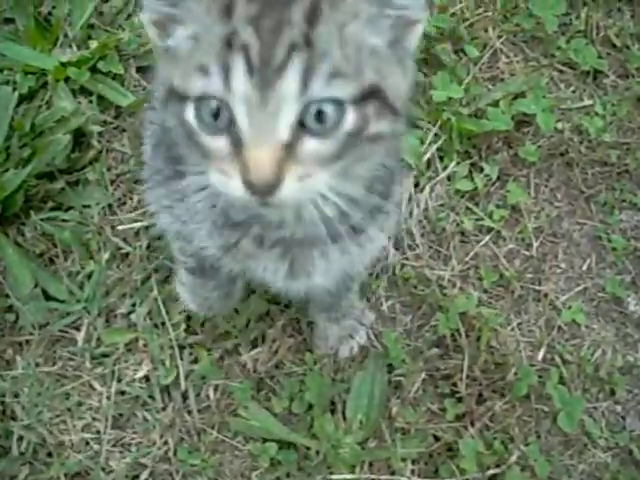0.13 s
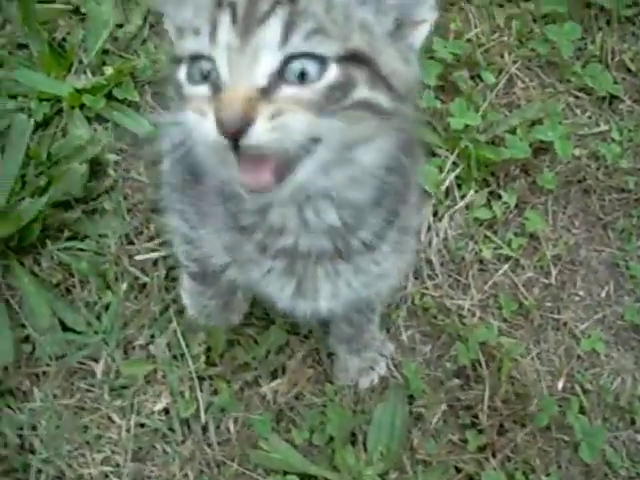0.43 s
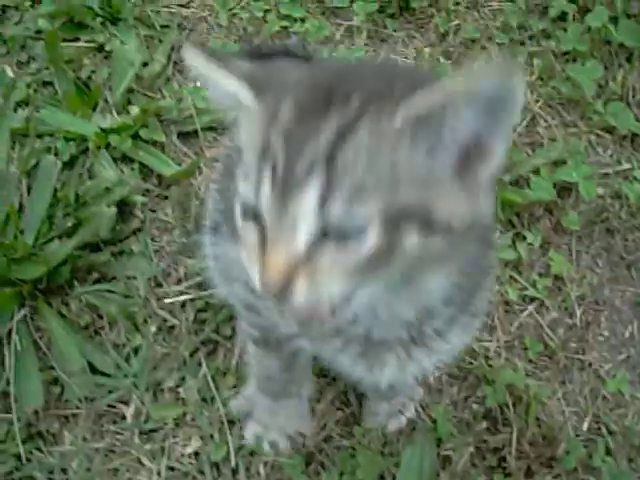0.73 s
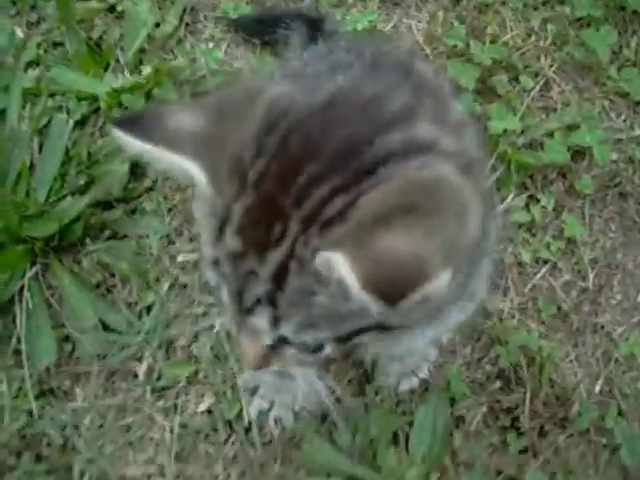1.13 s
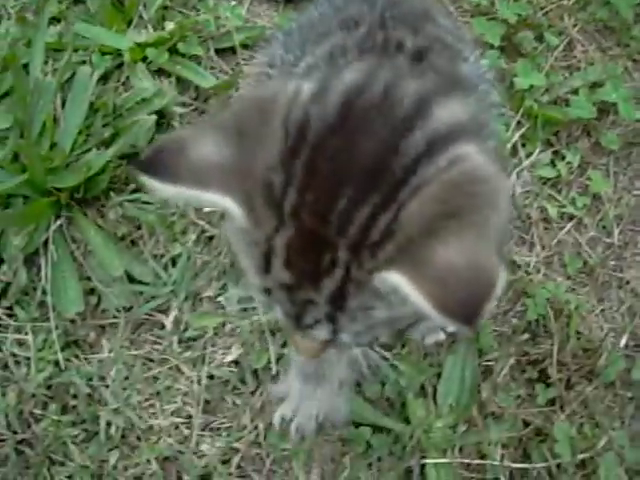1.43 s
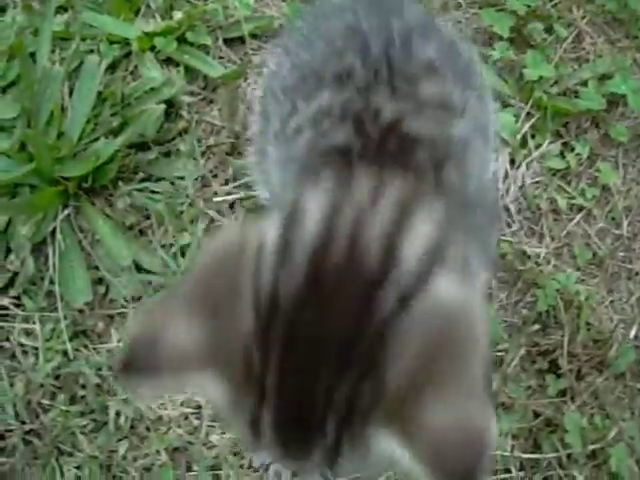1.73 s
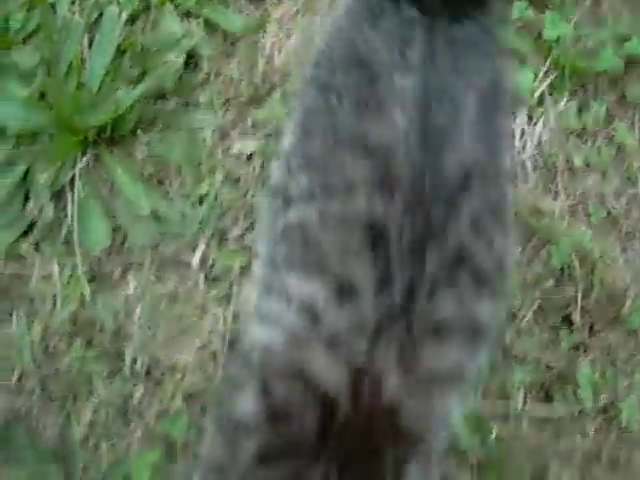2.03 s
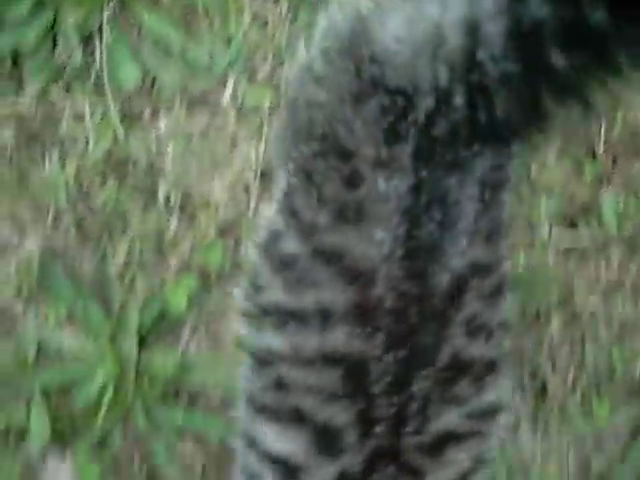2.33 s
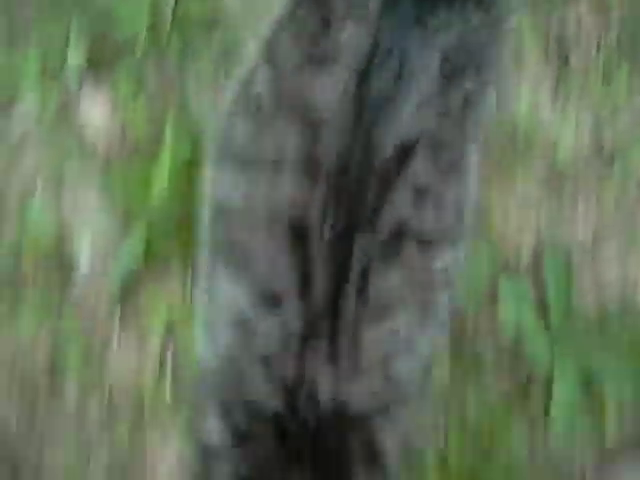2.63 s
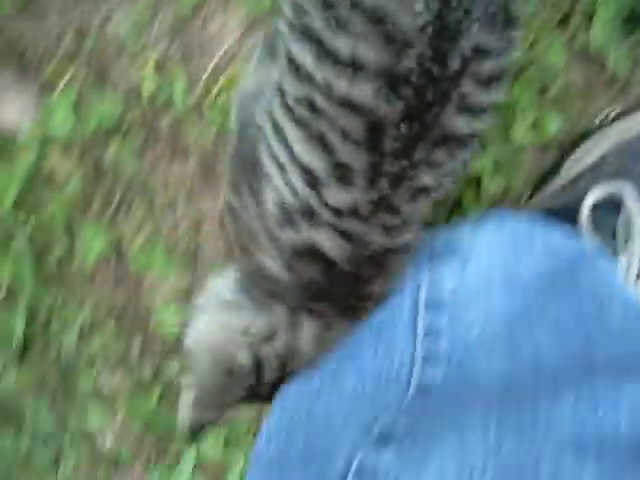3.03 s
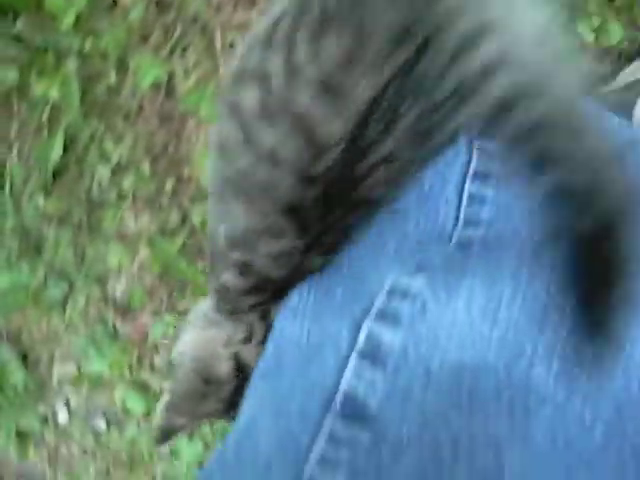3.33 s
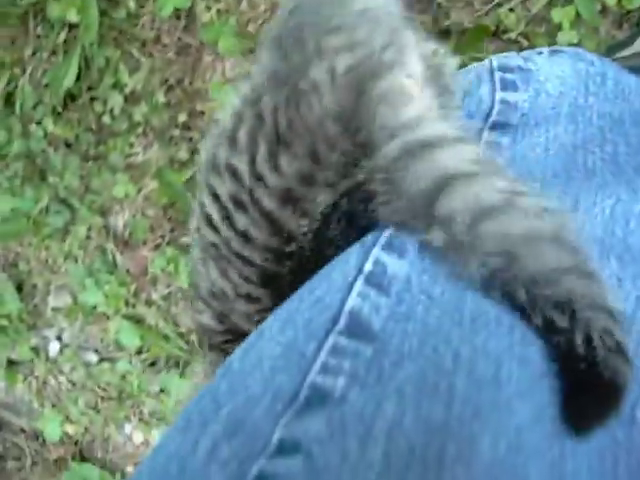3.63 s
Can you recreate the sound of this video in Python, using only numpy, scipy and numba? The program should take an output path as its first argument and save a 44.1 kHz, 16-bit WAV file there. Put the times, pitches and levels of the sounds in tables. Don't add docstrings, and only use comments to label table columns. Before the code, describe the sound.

A kitten meows once, close up outdoors: lip smacks at 0.3 s, a tiny squeak at 0.44, then a nasal cry from 0.46 to 1.24, dropping quickly to a wavering middle pitch, crackling around 0.8 and fading. Wet clicks follow at 1.25. Distant traffic rumble and low hum persist; a faint insect throbs near 1.7-2.3, paws and cloth rustle increasingly, and a sharp camera tap hits at 3.7. Grainy, treble-limited microphone.

```python
import sys
import numpy as np
from scipy import signal
from scipy.io import wavfile
from scipy.ndimage import uniform_filter1d
from numba import njit

SR = 44100
rng = np.random.default_rng(int(sys.argv[2]) if len(sys.argv) > 2 else 0)


def master(y):
    cut = np.clip(np.atleast_2d(y).T, -1, 1)
    pcm = np.round(cut * 32767)
    wavfile.write(sys.argv[1], SR, pcm.astype(np.int16))


def gain_from_db(level_db):
    decades = np.asarray(level_db, float) / 20
    return 10 ** decades


N = 166257

# f/Hz, level/dB [dB per Hz]
AIR_SPECTRUM = [(12, -27), (20, 0), (54, -5), (113, -4.5), (141, -8), (355, -15), (493, -18), (628, -11.5),
                (3800, -26), (4940, -52.5), (8360, -120)]
# t/s, level/dB
HUM_LEVEL = [(0, -58.5), (1.2, -53), (2.0, -58.5), (2.6, -66), (3.2, -62), (3.77, -59.5)]
# centre t/s, half length/s
INSECT_BOUTS = [
    (1.722, 0.18),
    (2.284, 0.36),
]
# t/s, level/dB
RUSTLE_LEVEL = [(0, -78.5), (1.6, -72), (2.6, -67.5), (3.0, -61.5), (3.3, -57.5), (3.77, -54.5)]
# t/s, boost level/dB
STEPS = [
    (1.62, 18),
    (2.07, 15),
    (2.63, 14.5),
    (2.9, 3),
    (3.069, 4),
    (3.14, 5.5),
    (3.3, 5.5),
]
# f/Hz, level/dB, t60/s
BODY_MODES = [(383, -18.5, 0.062), (1520, -7.5, .008), (2150, -2, 0.009), (3290, -12, 0.014),
              (3360, 0, 0.0074), (3526, -1.5, 0.014)]
# t/s, peak level/dB, low ring f/Hz, high ring f/Hz
SMACKS = [
    (.3070, -29, 1160, 2040),
    (.3410, -21.5, 980, 2100),
    (.350, -35, 1710, 1900),
    (0.372, -42.5, 3340, 3770),
    (1.2533, -31, 1270, 2300),
    (1.2574, -19.5, 1391, 2623),
    (1.2635, -36.5, 1000, 3200),
    (1.2975, -37.5, 2000, 2200),
]
# t/s, length/s, crackle peak level/dB, pulse rate f/Hz, clean tone dip level/dB
CATCHES = [
    (0.546, .006, -33.5, 560, -0.5),
    (0.672, .012, -28, 670, -0.5),
    (.775, 0.038, -24, 276, -1.5),
    (0.818, 0.01097, -19, 330, -7),
    (0.865, 0.015, -21.5, 560, -12),
    (0.898, 0.013, -28.5, 480, -6),
    (0.979, .013, -27, 450, -7),
    (1.016, .010, -29.5, 590, -6),
]
# t/s, length/s, pitch f/Hz, level/dB
SQUEAK = (.4365, .008, 1080, -38)
# t/s, pitch f/Hz, level/dB, mouth resonance f/Hz, chest tone level/dB
FALLING = [(0.458, 1069, -53, 2100, -46), (.463, 875, -53, 2150, -51.5), (.475, 774, -51, 2300, -53.5),
           (0.499, 678, -49, 2180, -57.5), (.53, 616, -46.5, 2340, -58.5), (.566, 579, -41.5, 2300, -63),
           (.6, 549, -38, 2215, -57.5), (.636, 522.3, -39.5, 2120, -61), (0.671, 516.3, -34.5, 2470, -62)]
HELD = [(.684, 495.3, -36.5, 2570, -55), (.702, 480.4, -34.5, 2790, -55), (.738, 486.4, -34, 2750, -59.5),
        (0.765, 491.3, -42.5, 2495, -63.5), (.83, 520.8, -37, 2240, -57), (0.861, 514.4, -42, 2253, -66),
        (0.896, 491.8, -40, 2170, -58.5), (0.939, 494.5, -44, 2255, -59.5),
        (0.971, 516.5, -43.5, 2010, -66.5)]
FADING = [(0.995, 518, -43.5, 2103, -56), (1.019, 568.5, -48, 2050, -65), (1.035, 531.5, -46.5, 2000, -57),
          (1.083, 525.8, -47, 1974, -63.5), (1.117, 487, -48, 2050, -56.5),
          (1.155, 466, -51.5, 2020, -61.5), (1.215, 415, -53.5, 1760, -62), (1.235, 422.6, -49, 1870, -61)]


def level(x, db):
    return x * gain_from_db(db) / np.sqrt(np.mean(x ** 2))


@njit
def svf(x, hz, width):
    y, b, l = np.empty(len(x)), 0., 0.
    for i in range(len(x)):
        g, k = np.tan(np.pi * hz[i] / SR), width / hz[i]
        v = (b + g * (x[i] - l)) / (1 + g * (g + k))
        b, l, y[i] = 2 * v - b, l + 2 * g * v, k * v
    return y


def band(x, hz, width):
    return svf(x, hz + np.zeros(N), 1. * width)


def walk(rate):
    k = int(SR / rate)
    held = np.repeat(rng.standard_normal(N // k + 1), k)
    slewed = uniform_filter1d(uniform_filter1d(held, k), k)[:N]
    return slewed / slewed.std()


def gate(t, start, length, rise, fall):
    attack = np.clip((t - start) / rise, 0, 1)
    release = np.clip((start + length - t) / fall + 1, 0, 1)
    return attack * release


def ring(t, start, hz, t60):
    contact_s = 0.00046
    u = np.maximum(t - start, 0)
    decay = np.exp(-np.log(1000) * u / t60)
    return np.sin(2 * np.pi * hz * u) * decay * (1 - np.exp(-u / contact_s))


def air():
    swell_db, flicker_db = 0.31, 1.66
    table_hz, table_db = np.array(AIR_SPECTRUM).T
    out, swell = 0, walk(0.57)
    for hz in 20 * 2 ** np.arange(0, 8, 1 / 3):
        spectrum_db = np.interp(np.log(min(hz, 3800)), np.log(table_hz), table_db)
        db = spectrum_db + swell_db * swell + flicker_db * walk(12)
        out = out + gain_from_db(db) * band(rng.standard_normal(N), hz, hz / 4)
    return level(out, -50)


def hum(t):
    hz = 112.5 * (1 + 0.0053 * walk(5))
    tone = np.sqrt(2) * np.sin(2 * np.pi * np.cumsum(hz) / SR)
    return tone * gain_from_db(np.interp(t, *np.array(HUM_LEVEL).T) + 0.71 * walk(3.4))


def insect(t):
    centre_hz, width_hz = 4000, 110
    hiss = band(rng.standard_normal(N), centre_hz, width_hz)
    hiss = band(hiss, centre_hz, width_hz)
    bouts = sum(np.exp(-((t - s) / span) ** 2) for s, span in INSECT_BOUTS)
    return level(hiss, -71) * gain_from_db(5.6 * walk(18)) * bouts


def rustle(t):
    grains_per_s, spread_db, step_s = 2500, 1.5, .012
    struck = rng.random(N) < grains_per_s / SR
    grains = struck * rng.standard_normal(N) * gain_from_db(spread_db * rng.exponential(size=N))
    steps_db = sum(db * np.exp(-((t - s) / step_s) ** 2) for s, db in STEPS)
    cloth = level(band(rng.standard_normal(N), 1000, 620), 0)
    grass = level(band(grains, 3500, 1400), 0) * gain_from_db(1.2 * walk(15) + steps_db)
    return (grass + cloth) * gain_from_db(np.interp(t, *np.array(RUSTLE_LEVEL).T))


def tap(t):
    start_s, bounce_s = 3.7000, .0007
    out = 0
    for hz, db, t60 in BODY_MODES:
        bounce = 0.13 * ring(t, start_s + bounce_s, hz, t60)
        out = out + gain_from_db(db) * (ring(t, start_s, hz, t60) + bounce)
    return gain_from_db(-12) * 0.86 * out


def smacks(t):
    mouth_t60_s, edge_hz, edge_t60_s, edge_db = 0.006, 3100, 0.0047, -2.5
    out = 0
    for start, db, low, high in SMACKS:
        mouth = 0.87 * ring(t, start, low, mouth_t60_s) + 1.09 * ring(t, start, high, mouth_t60_s)
        edge = gain_from_db(edge_db) * ring(t, start, edge_hz, edge_t60_s)
        out = out + gain_from_db(db) * (mouth + edge)
    return out


def folds(hz):
    phase = 2 * np.pi * np.cumsum(hz) / SR
    return [np.cos(k * phase) * np.clip((5000 - k * hz) / 400, 0, 1) for k in range(1, 13)]


def crackle(mouth_hz):
    width_hz, scatter, scatter_db = 560, .35, 3
    kicks = np.zeros(N)
    for start, length, db, rate, _ in CATCHES:
        timing, loudness = rng.standard_normal((2, 16)) * (250 / rate) ** 2
        at = np.cumsum(np.clip(1 + scatter * timing, .5, 2)) / rate - .5 / rate
        inside = at < length
        swell = np.sin(np.pi * at[inside] / length) ** 0.87
        pulse_db = db + scatter_db * np.tanh(loudness[inside])
        kicks[((start + at[inside]) * SR).astype(int)] = swell * gain_from_db(pulse_db)
    throat_hz = np.minimum(mouth_hz, 2560) * 1.006
    rung = band(band(kicks, throat_hz, width_hz * 2), throat_hz, width_hz)
    rung = rung + .08 * band(kicks, 3400, 700)
    return rung * SR / (4 * width_hz)


def squeak(t):
    start, length, pitch_hz, db = SQUEAK
    chirp = band(sum(folds(pitch_hz + 0 * t)), 1600, 600)
    return level(chirp, db) * gate(t, start, length - .003, 0.0056, .003)


def mouth_filter(source, mouth_hz):
    width_hz = 624
    main = band(band(source, mouth_hz, width_hz * 2), mouth_hz, width_hz)
    opening_hz = mouth_hz - 2200
    upper_db = -19.5 + 7.5 * opening_hz / 1000
    upper = gain_from_db(upper_db) * band(source, 3330 + .55 * opening_hz, 350)
    return main + upper + gain_from_db(-9.5) * band(source, 1900, 430)


def meow(t):
    jitter, shimmer_db, breath_db, octave_db = .004, 1.5, -20.5, 0.5
    s, hz, db, mouth_table_hz, chest_db = np.array(FALLING + HELD + FADING).T
    mouth_hz = np.interp(t, s, mouth_table_hz)
    tones = folds(np.interp(t, s, hz) * (1 + jitter * walk(70)))

    breath = gain_from_db(breath_db) * 6 * rng.standard_normal(N) * (1 + tones[0])
    main = mouth_filter(sum(tones[1:]) + breath, mouth_hz)
    voice = main / np.sqrt(uniform_filter1d(main ** 2, 900)) * gain_from_db(np.interp(t, s, db))
    chest = np.sqrt(2) * (tones[0] + gain_from_db(octave_db) * tones[1])
    voice = voice + chest * gain_from_db(np.interp(t, s, chest_db))

    dip_db = sum(dip * gate(t, start - .004, length + .004, 0.0049, 0.0026)
                 for start, length, _, _, dip in CATCHES)
    voice = voice * gain_from_db(dip_db + shimmer_db * walk(59.74))
    voice = voice * gate(t, s[0], s[-1] - s[0], .0015, 0.0092)
    return voice + squeak(t) + crackle(mouth_hz)


def scene():
    t = np.arange(N) / SR
    background = air() + hum(t) + insect(t) + rustle(t)
    return (background + tap(t) + smacks(t) + meow(t))[None]


def roll_off(x):
    return signal.sosfilt(signal.butter(12, 4720, fs=SR, output="sos"), x)


def record(dry):
    sampling_hz, input_hz, output_hz = 8000, 4110, 4094
    grain = gain_from_db(-22.5) * 3 * uniform_filter1d(np.abs(dry), 40) * rng.standard_normal(N)
    input_filter = signal.butter(6, input_hz, fs=SR, output="sos")
    taken = signal.sosfiltfilt(input_filter, dry + grain)
    mirrored = taken * (1 + 2 * np.cos(2 * np.pi * sampling_hz * np.arange(N) / SR))
    output_filter = signal.butter(20, output_hz, fs=SR, output="sos")
    mix = signal.sosfiltfilt(output_filter, mirrored)
    return roll_off(mix)


dry = scene()
out = record(dry)
master(out)
```